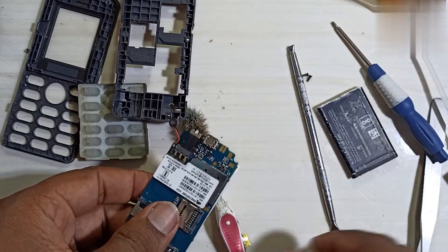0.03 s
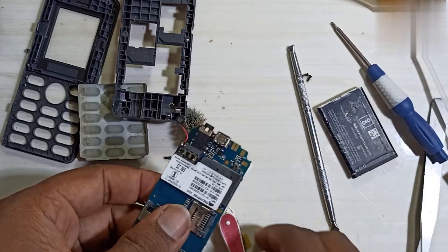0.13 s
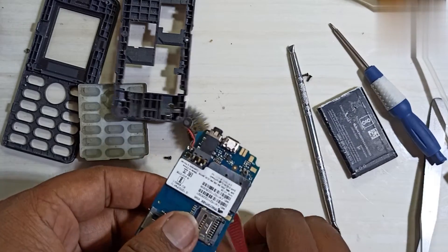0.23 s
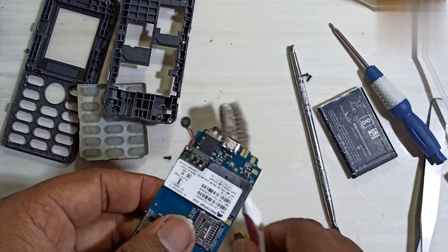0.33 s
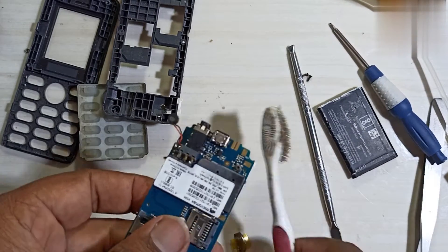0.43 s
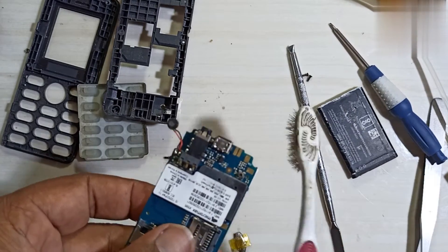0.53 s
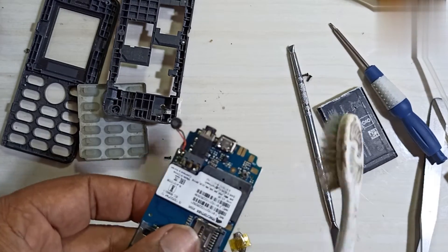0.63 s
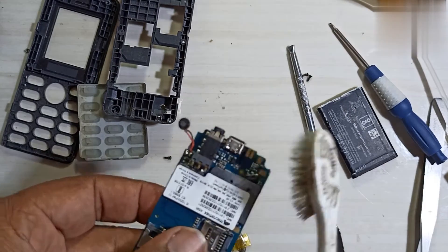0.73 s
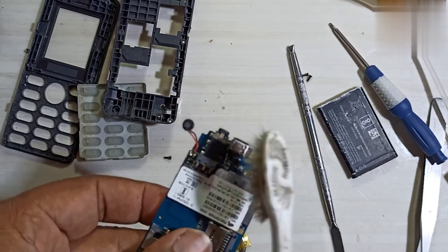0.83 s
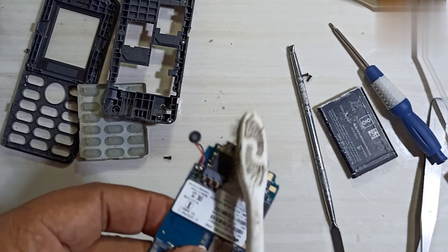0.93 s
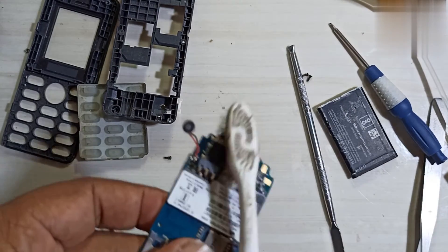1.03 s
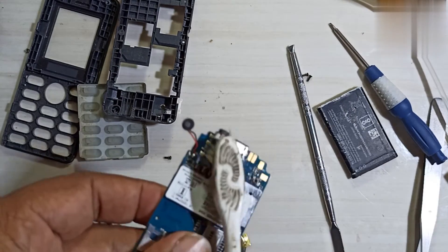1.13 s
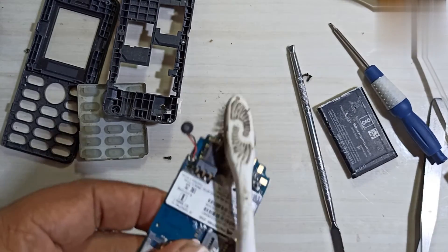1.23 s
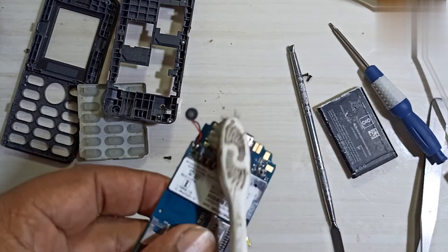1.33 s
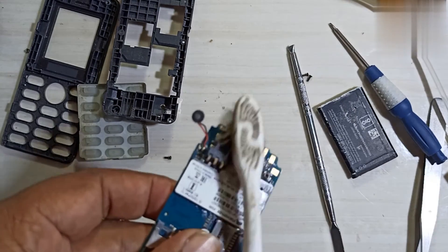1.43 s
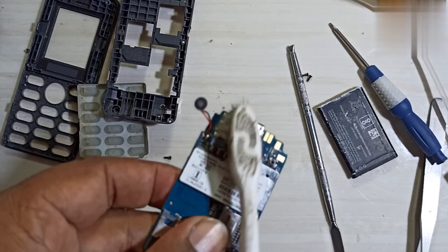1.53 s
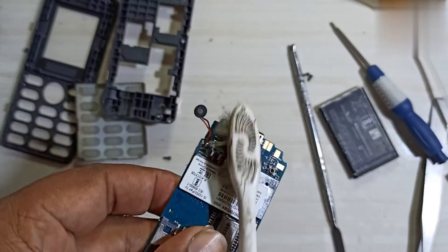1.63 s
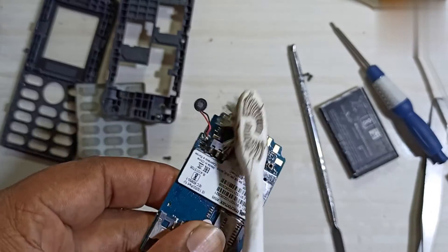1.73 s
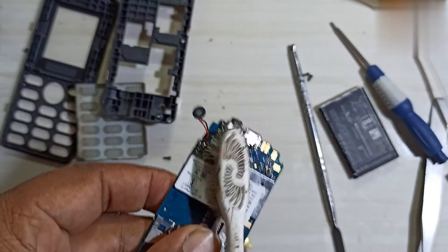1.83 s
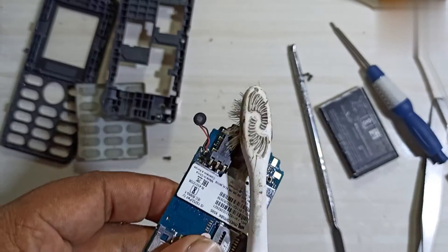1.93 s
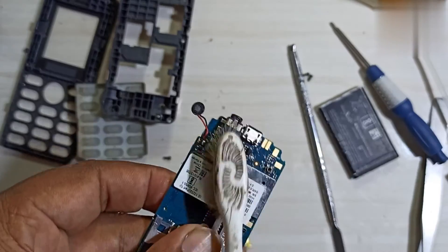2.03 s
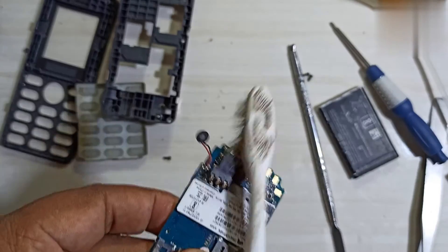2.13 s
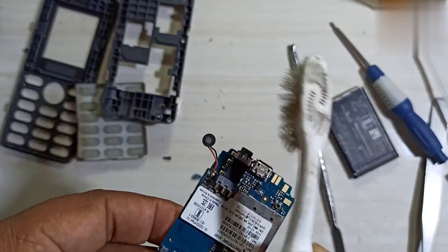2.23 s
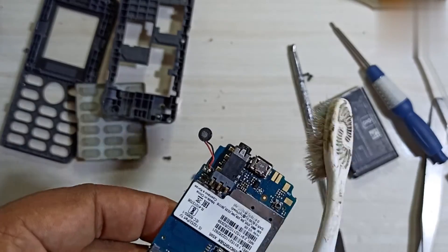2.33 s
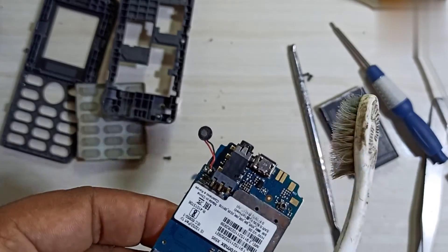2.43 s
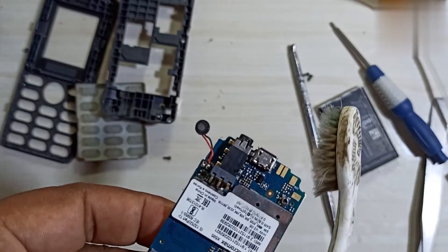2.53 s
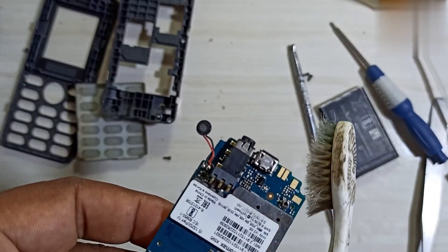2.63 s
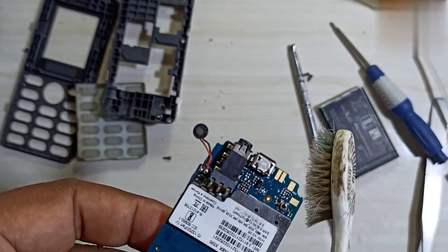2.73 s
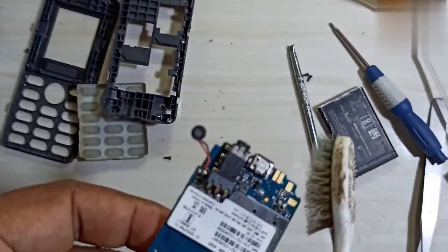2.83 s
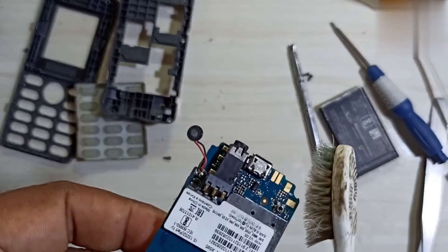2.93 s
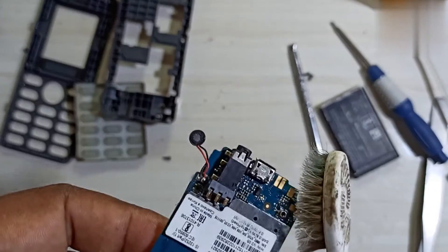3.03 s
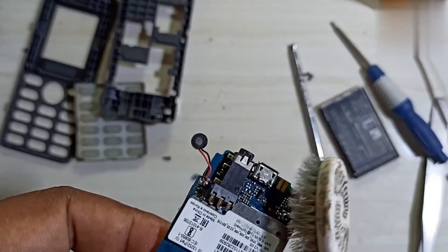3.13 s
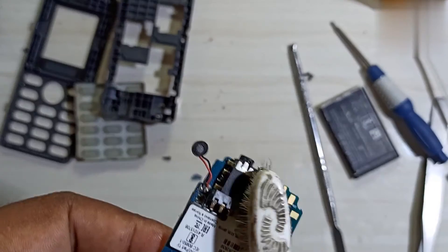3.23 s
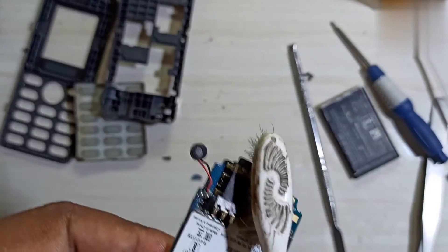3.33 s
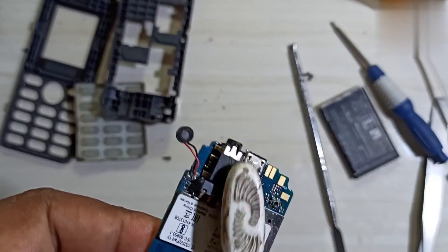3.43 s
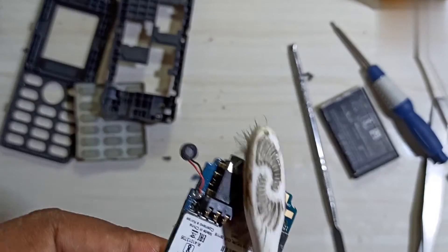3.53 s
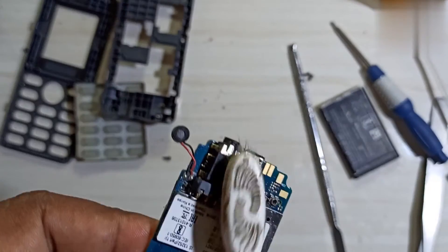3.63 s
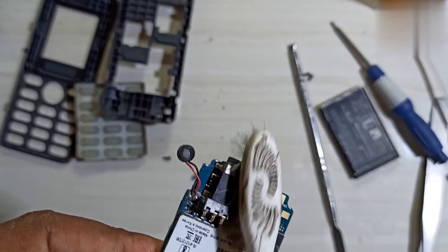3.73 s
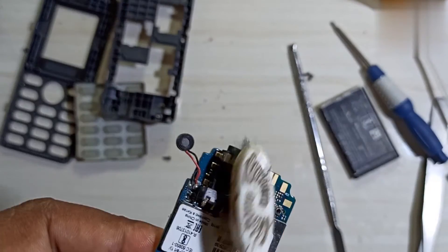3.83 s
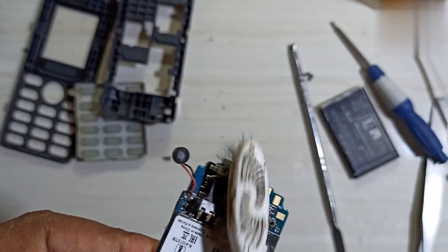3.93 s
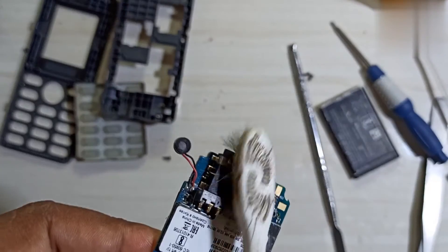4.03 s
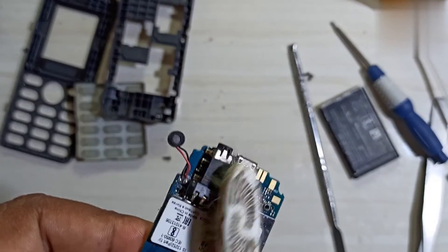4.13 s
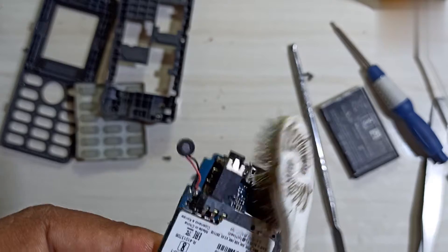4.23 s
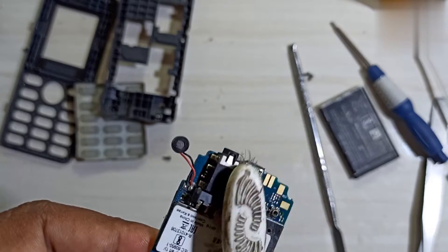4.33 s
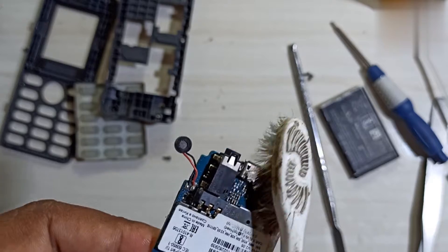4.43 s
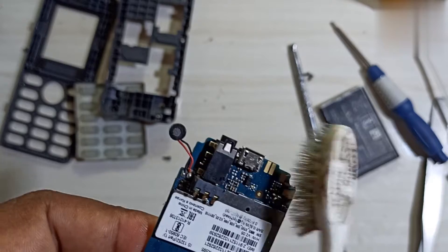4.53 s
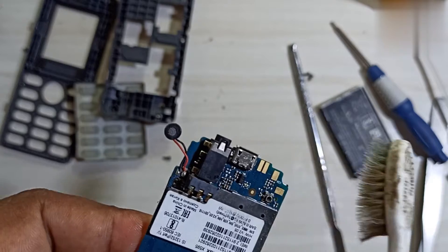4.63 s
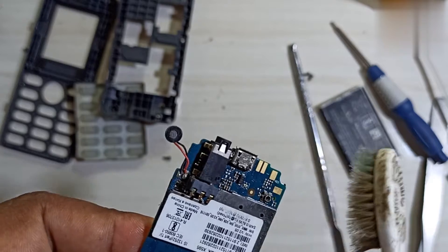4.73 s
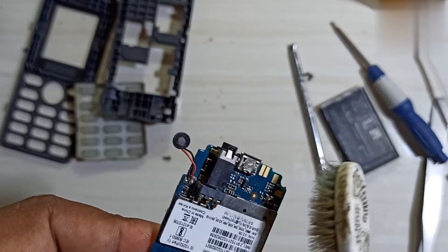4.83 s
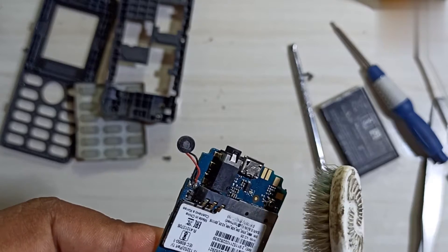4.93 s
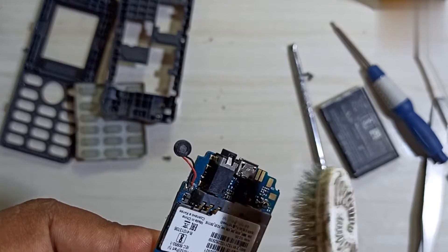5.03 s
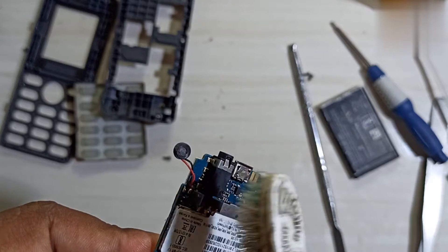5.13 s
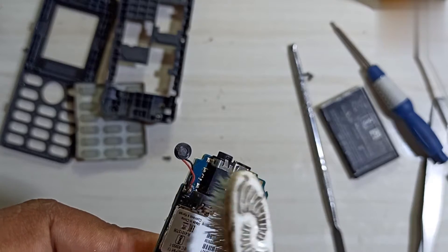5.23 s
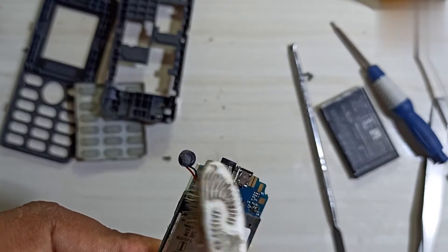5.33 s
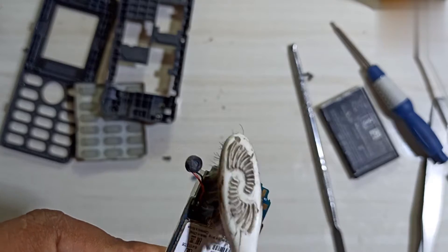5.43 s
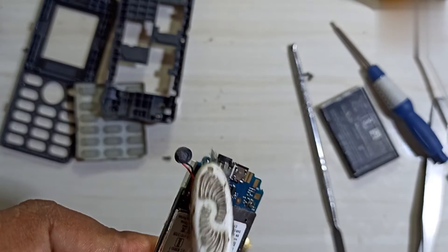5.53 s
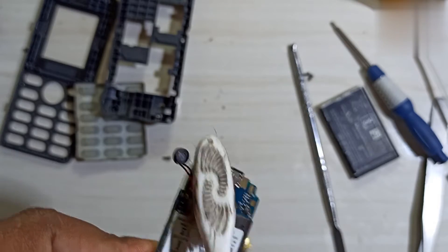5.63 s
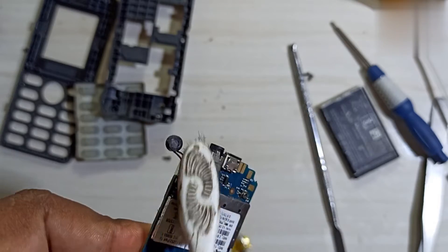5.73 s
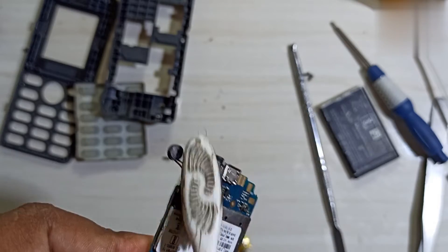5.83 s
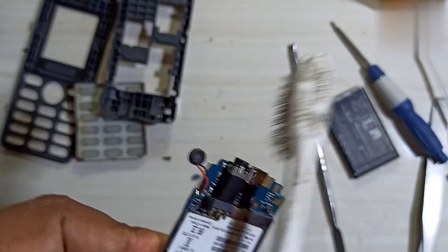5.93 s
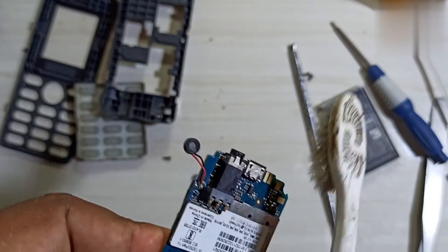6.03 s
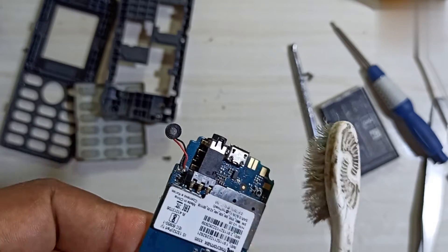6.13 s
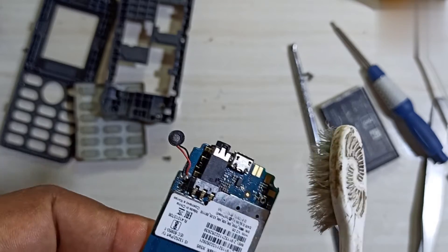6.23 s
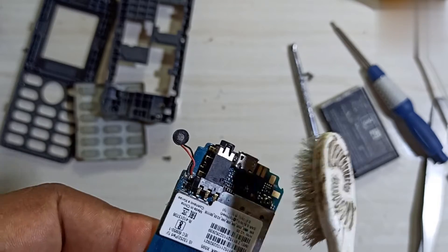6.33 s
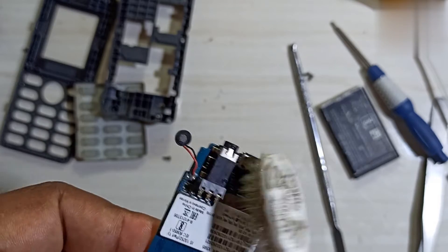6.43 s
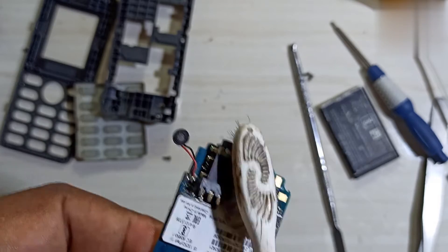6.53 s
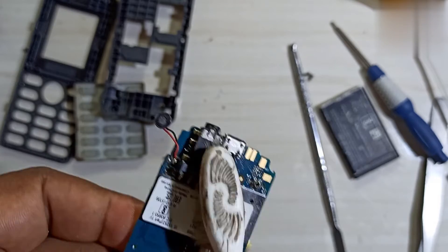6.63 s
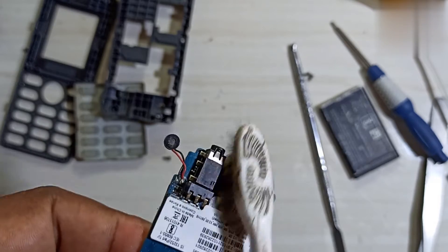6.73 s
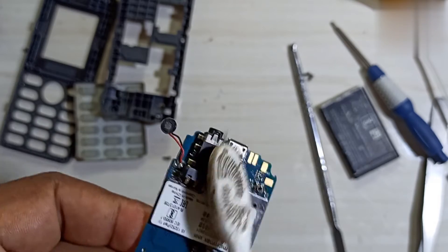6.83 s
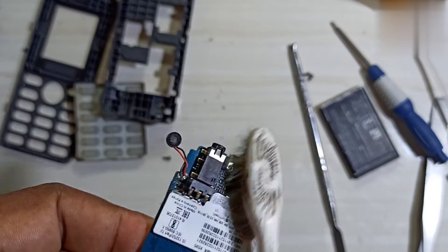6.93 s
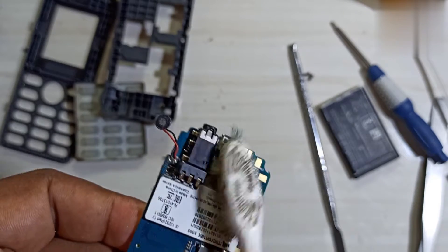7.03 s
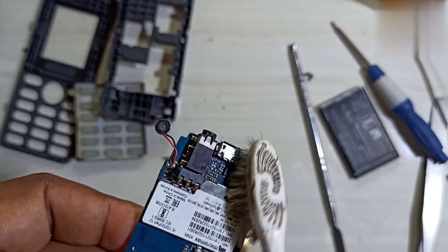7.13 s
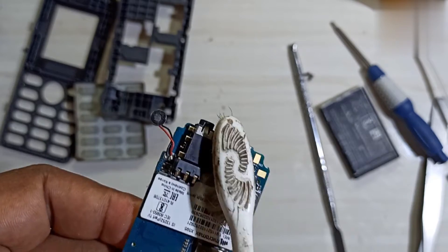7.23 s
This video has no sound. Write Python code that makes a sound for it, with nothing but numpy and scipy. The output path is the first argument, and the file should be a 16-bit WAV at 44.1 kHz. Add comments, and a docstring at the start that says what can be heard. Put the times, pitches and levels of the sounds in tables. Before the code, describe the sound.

A plastic brush handle clacks sharply as it is picked up, followed by rapid, raspy bristle strokes on a hand-held phone board. Two strong bursts are separated by about a second of quiet fan hum; a weaker burst follows, ending in a loud cluster of clicks, and after another gap the scrubbing resumes. Heard very close and dry, with only a short trace of room echo.

```python
"""A fan drones in a quiet room while a toothbrush is picked off a bench, bumping and scuffing close by.
From 0.9 s it scrubs a small circuit board in bursts of short dry strokes: bristle tips slip in dense random
ticks that ring the board, and tufts snap off its parts, hardest just after 5.9 s.
Near 5.7 s a faint wavering tone squeaks. Bumps and ringing are decaying tones and coloured noise."""
import sys
import numpy as np
from scipy import signal
from scipy.fft import rfft, irfft, next_fast_len
from scipy.io import wavfile
from scipy.ndimage import uniform_filter1d

SR = 44100
rng = np.random.default_rng(int(sys.argv[2]) if len(sys.argv) > 2 else 0)


def wav_out(sig):
    """Save sig, one row per channel (or a flat mono array), as 16-bit PCM at SR to the path in sys.argv[1]."""
    wavfile.write(sys.argv[1], SR, np.round(np.clip(np.atleast_2d(sig).T, -1, 1) * 32767).astype(np.int16))


N = 321930
M = next_fast_len(N + 8192)  # padded length for filtering
HZ = np.maximum(np.arange(M // 2 + 1) * SR / M, 1)
TIME = np.arange(N) / SR
SIDE = np.array([[1], [-1]])  # left, right


def undb(db):
    """Turn decibels into an amplitude factor."""
    return np.exp(np.asarray(db) * (np.log(10) / 20))


def on_hz(points):
    """Read a (Hz, value) table at every frequency, along a logarithmic pitch scale."""
    hz, value = np.transpose(points)
    return np.interp(np.log(HZ), np.log(hz), value)


def causal(db):
    """Make a filter with this gain that never sounds ahead of its input, from the folded cepstrum."""
    cepstrum = irfft(db * np.log(10) / 20, M)
    cepstrum[1:M // 2] *= 2
    cepstrum[M // 2 + 1:] = 0
    return np.exp(rfft(cepstrum))


def unit(x):
    """Scale to an RMS level of 1."""
    return x / np.sqrt(np.mean(x ** 2))


def smooth_twice(x, width, axis=-1):
    """Run a moving average over the values twice."""
    return uniform_filter1d(uniform_filter1d(x, width, axis=axis), width, axis=axis)


def walk(rate):
    """Wander at random: values held for 1 / rate seconds, then smoothed twice; spread near 1."""
    hold = int(SR / rate)
    steps = np.repeat(rng.standard_normal(N // hold + 1), hold)
    return unit(smooth_twice(steps, hold)[:N])


def spread(shared, make):
    """Make two channels that have one part in common and one part each."""
    shared = np.clip(shared, 0, 1)
    return np.sqrt(shared) * make() + np.sqrt(1 - shared) * np.array([make(), make()])


def fade(t60):
    """Fall by 60 dB in t60 seconds: the factor kept from one sample to the next."""
    return undb(-60 / t60 / SR)


def room():
    """Fan drone (narrow bands of noise) and air noise, over the microphones' own hiss."""
    # Colour of the air noise. Each row: frequency in Hz, relative level in dB per Hz.
    air_tone = [(18, -90), (30, -37), (65, -18.5), (126, -2), (207, -8), (233, -11), (262, -8.5),
                (431, -13), (916, -19.5), (1110, -22.5), (1580, -22), (2250, -25), (2700, -32.5),
                (5240, -39.5), (6790, -53), (8400, -62), (10900, -78), (18500, -120)]
    # Fan drone bands. Each row: centre in Hz, width in Hz, level in dB before wavering and left-right balance.
    fan_bands = [(83.5, 7.8, -70), (122, 14, -67.5), (163, 42, -75), (200.5, 10, -69), (922.5, 23, -76.5)]
    # How alike left and right are. Each row: frequency in Hz, likeness from -1 (opposite) to 1 (same).
    room_likeness = [(40, 0.099), (130, 1), (290, 0.44), (640, 0.34), (1400, -0.31), (3000, -0.055)]
    # Colour of the microphones' hiss. Each row: frequency in Hz, relative level in dB per Hz.
    hiss_tone = [(2500, -7), (6000, -1.5), (7000, -1), (8400, -7.5), (12000, -11.5), (15500, -11)]

    alike = np.clip(on_hz(room_likeness), -.99, .99)
    mid, side = rfft(rng.standard_normal((2, M))) * np.sqrt([1 + alike, 1 - alike])
    white = np.array([mid + side, mid - side])
    air = unit(irfft(white * undb(on_hz(air_tone)), M)[:, :N])
    air = air * undb(-54.5 + 0.17 * walk(4.74))
    for hz, width, db in fan_bands:
        band = white / (1 + (2 * (HZ - hz) / width) ** 2)
        air = air + undb(db + 3.3 * walk(6.0)) * unit(irfft(band, M)[:, :N])
    hiss = unit(irfft(rfft(rng.standard_normal((2, M))) * undb(on_hz(hiss_tone)), M)[:, :N])
    # the drone and the air are a little stronger on the right
    air = air * undb([[-.6], [.6]])
    return air + hiss * undb(-66.0 + 0.6 * walk(3))


def handle():
    """Each contact scuffs in a band set by its hardness, rings nearby modes of the handle, thuds and rattles."""
    # The handle meets the bench. Each row: start in seconds, relative level in dB, contact centre in Hz,
    # fade by 60 dB in seconds, relative level of the bench thud in dB.
    knocks = [(0, -39.5, 3400, 0.18, -42), (.002, -43, 7280, .25, -70), (0.067, -50, 7500, .06, -70),
              (0.059, -45, 900, 0.094, -48), (0.149, -46.5, 2310, 0.059, -39),
              (0.1844, -50, 1890, 0.057, -36), (0.186, -40.5, 720, 0.035, -58),
              (0.199, -49, 2500, 0.052, -63), (.208, -48.5, 2250, 0.094, -36),
              (0.24, -47.5, 4320, 0.3, -55), (0.271, -28, 2000, 0.088, -54), (.286, -23, 6800, 0.077, -53),
              (0.2856, -19.5, 3560, 0.034, -38), (0.2926, -27.5, 7200, 0.025, -41),
              (0.299, -37.5, 940, 0.27, -44), (.3, -44, 444, 0.4, -64), (0.331, -44, 4300, 0.2, -40),
              (0.368, -50, 4260, 0.13, -53), (.41, -69, 4250, 0.16, -63), (0.445, -55, 4130, .24, -69),
              (0.501, -52, 3030, 0.061, -61), (.54, -51.5, 6900, 0.17, -65)]
    # Ringing modes of the handle. Each row: frequency in Hz, relative level in dB, longest fade in seconds.
    handle_modes = [(129, 11.5, 0.11), (206, 3, .08), (317, 2, 0.08), (499, 2, .1), (721, 2.5, 0.095),
                    (925, 0.5, .15), (1674, 2, 0.033), (2615, -4, 0.025), (3170, -4.5, 0.028),
                    (3390, -3.5, 0.045), (4220, -1, 0.064), (6200, 4, 0.035), (7240, 3, 0.041),
                    (8050, 1, 0.043)]
    # Bench thud and soft rattle. Each: centre in Hz, reach in octaves, fade by 60 dB in seconds,
    # share alike at both ports, rise as a share of the fade.
    thud_kind, rattle_kind = (200, 1.57, 0.2, 1.05, 0.027), (2700, 1.44, 0.17, 0.47, 0.0059)
    ring_db, rattle_db, grit_db = -8, -13, -22  # ring and grit join the scuff; rattle is relative to the bump
    crack_db, crack_t60_s = -12, 0.016  # first instant of a contact
    left_lead_s = .00004

    out, t = np.zeros((2, N)), TIME[:12000]
    hz = np.maximum(np.fft.rfftfreq(len(t), 1 / SR), 1)
    # continued rubbing keeps the same modes sounding, roughly
    body = 0.82 + sum(undb(db) / (1 + ((hz - f) / (0.046 * f + 15)) ** 2) for f, db, _ in handle_modes)

    def contact(db, centre_hz, octaves, t60, alike, rise, grit=0):
        """One touch: ringing modes plus a scuff of noise, both strongest near the contact's centre."""
        def reach(f):
            return 1 / (1 + (np.log2(f / centre_hz) / octaves) ** 4)

        ring = 0
        for f, mode_db, own_t60 in handle_modes:
            decay = undb(mode_db - 60 * t / min(own_t60, t60, .06))
            ring = ring + reach(f) * decay * np.sin(2 * np.pi * (f * t + rng.random()))
        noise = spread(alike, lambda: rng.standard_normal(len(t)))
        scuff = unit(irfft(rfft(noise) * (reach(hz) * body + grit * (hz > centre_hz))))
        scuff = scuff * (0.43 * undb(-60 * t / t60) + undb(crack_db - 60 * t / crack_t60_s))
        onset = t / (t + rise * t60)
        return undb(db) * onset * (undb(ring_db) * ring + scuff)

    for start, db, contact_hz, t60, thud_db in knocks:
        bump = contact(db, contact_hz, 0.95, t60, alike=0.53, rise=0.011, grit=undb(grit_db))
        bump = bump + contact(thud_db, *thud_kind) + contact(db + rattle_db, *rattle_kind)
        out[:, int(start * SR):int(start * SR) + len(t)] += bump
    return irfft(rfft(out, M) * np.exp(1j * np.pi * SIDE * HZ * left_lead_s), M)[:, :N]


def slips(per_s, scatter_db):
    """Bristle tips letting go at random moments, a few much harder than the rest."""
    chance = rng.random((2, N))
    size = undb(scatter_db * np.minimum(rng.exponential(size=N), 4.5)) * np.sign(chance[1] - .5)
    return unit((chance[0] < per_s / SR) * size)


def patchy(pair):
    """The bristles cross other parts from moment to moment, so the colour of the scrub keeps shifting."""
    _, _, spectrum = signal.stft(pair, nperseg=512)

    def field(hz, s):
        """Random levels in patches about this broad and this long."""
        bins, frames = max(int(hz * 512 / SR), 1), max(int(s * SR / 256), 1)
        patches = smooth_twice(rng.standard_normal(spectrum.shape[1:]), bins, axis=0)
        return unit(smooth_twice(patches, frames, axis=1))

    # short broad patches, and finer colour that lasts about a stroke
    db = 2.48 * field(hz=450, s=.02) + 1.2 * field(hz=120, s=.12)
    return unit(signal.istft(spectrum * undb(db), nperseg=512)[1][:, :N])


def strokes(ring_db):
    """Each stroke speeds up and slows down; its power is shared between bristle hiss and board ring."""
    # Strokes on the board. Each row: fastest moment in seconds, length in seconds, relative level in dB, kind.
    scrubs = [(0.918, .048, -53, 'dab'), (0.987, 0.13, -48.5, 'back'), (1.14, 0.12, -44.5, 'out'),
              (1.23, .12, -40, 'back'), (1.376, 0.13, -43.5, 'out'), (1.472, 0.12, -44, 'back'),
              (1.599, 0.11, -41, 'out'), (1.698, 0.14, -41.5, 'back'), (1.835, 0.12, -41, 'out'),
              (1.926, 0.12, -36.5, 'back'), (2.066, 0.11, -37, 'out'), (2.161, 0.16, -36, 'back'),
              (2.24, 0.3, -67.5, 'back'), (3.279, 0.083, -49.5, 'dab'), (3.342, 0.088, -43, 'back'),
              (3.469, 0.11, -44, 'out'), (3.555, 0.11, -41.5, 'back'), (3.681, 0.1, -43, 'out'),
              (3.766, 0.12, -42.5, 'back'), (3.9, 0.11, -42, 'out'), (3.988, 0.13, -40.5, 'back'),
              (4.131, 0.11, -37, 'out'), (4.213, .14, -39.5, 'back'), (4.319, 0.1, -39, 'back'),
              (4.432, 0.15, -42.5, 'back'), (4.535, 0.09, -57, 'out'), (5.384, 0.045, -56.5, 'dab'),
              (5.439, 0.1, -52, 'back'), (5.576, 0.11, -49.5, 'out'), (5.665, 0.11, -50, 'back'),
              (5.793, 0.094, -49, 'out'), (5.887, 0.086, -48.5, 'out'), (5.919, 0.12, -39, 'dab'),
              (6.01, 0.17, -67, 'back'), (6.065, 0.035, -49.5, 'dab'), (6.127, .093, -70, 'back'),
              (6.57, .13, -48, 'out'), (6.672, 0.1, -47.5, 'out'), (6.754, 0.15, -41.5, 'back'),
              (6.886, 0.09, -39, 'out'), (6.965, 0.15, -42, 'back'), (7.091, 0.11, -42, 'out'),
              (7.155, 0.14, -47, 'back'), (7.251, 0.11, -48.5, 'back')]
    # Outward strokes peak late, returns midway, dabs early.
    # Each kind: share of the stroke spent speeding up, extra board ring in dB.
    stroke_kinds = {'out': (0.76, -0.23), 'back': (0.53, 0.33), 'dab': (0.28, -0.37)}
    steepness = 2.27  # of a stroke's ends
    splay = 1  # bristles splay at speed, which flattens a stroke's top (lower = flatter)
    hiss_drag_db, ring_drag_db, drag_round = -17, -12.5, 0.38  # drag that fills out the slow ends

    hiss_power, ring_power = np.zeros(N), np.zeros(N)
    for fastest, length, db, kind in scrubs:
        rise, extra_ring_db = stroke_kinds[kind]
        start = fastest - rise * length
        end = start + length
        at = slice(int(start * SR), int(end * SR))
        speed = np.sin(np.pi * np.interp(TIME[at], [start, fastest, end], [0, .5, 1])) ** 2
        scrape = speed ** steepness * (1 + splay) / (speed ** steepness + splay)
        drag = speed ** drag_round
        share = undb(2 * (ring_db[at] + extra_ring_db))  # ring power over hiss power
        hiss_power[at] += (scrape + undb(2 * hiss_drag_db) * drag) * undb(2 * db) / (1 + share)
        ring_power[at] += (scrape + undb(2 * ring_drag_db) * drag) * undb(2 * db) / (1 + 1 / share)
    return hiss_power, ring_power


def tufts(hiss_power):
    """Tufts land on or snap off parts: a sharp tick with a short spray, and a fading rattle of slips."""
    # Tuft contacts. Each row: start in seconds, relative tick level in dB, relative rattle level in dB.
    snaps = [(0.9145, -25, -39.5), (1.1913, -34, -54), (1.2063, -17, -47), (1.3295, -28, -52),
             (1.399, -23, -46), (1.663, -18, -38), (1.705, -12, -41), (1.829, -12, -37), (1.876, -11, -35),
             (2.009, -22, -46), (2.113, -15, -39), (2.1524, -13, -46), (2.199, -11, -33),
             (2.245, -19.5, -43), (3.2352, -33, -38), (3.2547, -29, -41.5), (3.4156, -27, -52),
             (3.4528, -17, -34), (3.518, -26, -46), (3.746, -22, -46), (4.001, -24, -35),
             (4.0696, -28, -54), (4.1701, -28, -46), (4.3133, -11.5, -44), (4.4035, -17.5, -47),
             (5.38, -34, -51), (5.5562, -31, -43), (5.607, -34, -47), (5.6603, -12, -51),
             (5.9113, 2.5, -25), (5.9246, -21, -36), (5.945, -15, -36), (5.966, -16, -39.5),
             (5.977, -6.5, -34), (5.9793, -10, -50), (6.0628, -10, -47), (6.0745, -14, -48),
             (6.083, -28, -43), (6.177, -43, -50.5), (6.4304, -48, -61), (6.486, -43, -56),
             (6.518, -31, -47), (6.559, -23, -44), (6.6285, -38, -57), (6.649, -23, -39), (6.707, -22, -41),
             (6.832, -25, -46), (6.936, -16, -38), (7.052, -20, -41), (7.145, -26, -41), (7.2489, -29, -44)]
    catches_per_s, catch_tick_db, catch_rattle_db = 45, 15, -15  # small catches; relative to the stroke's hiss
    rattle_t60_s, spray_t60_s, spray_db = 0.038, 0.01, -15

    # smaller tufts catch at random, about as hard as the stroke is at that moment
    catches = (rng.random(N) < catches_per_s / SR) * np.sqrt(hiss_power) * undb(1.1 * rng.standard_normal(N))
    snap, shake = catches * undb(catch_tick_db), catches * undb(catch_rattle_db)
    for start, tick_db, rattle_db in snaps:
        snap[int(start * SR)], shake[int(start * SR)] = undb(tick_db), undb(rattle_db)
    rattle = spread(0.067, lambda: slips(per_s=19000, scatter_db=6.5))
    rattle = rattle * signal.lfilter([1], [1, -fade(rattle_t60_s)], shake)
    # a tuft lets go bristle after bristle
    spray = spread(0.9, lambda: rng.standard_normal(N)) * signal.lfilter([1], [1, -fade(spray_t60_s)], snap)
    return 0.68 * snap + undb(spray_db) * spray, rattle


def ports(spectra):
    """The left port hears the brush a little earlier, and the two ports differ in colour."""
    # Left port against right. Each row: frequency in Hz, left minus right in dB.
    port_difference = [(1000, -3.5), (2400, -4.5), (3900, -4.5), (4300, 0.5), (4900, -9), (5750, 7.5),
                       (6300, -4.5), (6750, -2.5), (7300, 3), (8300, -2), (9300, -8.5), (12000, -8.5),
                       (15000, -9)]
    left_lead_s = 0.00013
    lead = np.exp(1j * np.pi * SIDE * HZ * left_lead_s)
    return irfft(spectra * undb(SIDE * on_hz(port_difference) / 2) * lead, M)[:, :N]


def brush():
    """Slipping bristles hiss, ring and bend the board, harder as they move faster; tufts tick on its parts."""
    # Where the brush works. Each row: time in seconds, board ring minus bristle hiss in dB before the
    # layers' own gains, left minus right in dB before the ports' colour.
    places = [(.92, -10, 3), (.99, -8.5, 4.5), (1.6, -8.5, 6), (2.17, -10, 5.5), (2.25, -2.5, 2.5),
              (3.25, -8.5, 8.5), (3.33, -7.5, 5.5), (3.47, -6.5, 7.5), (3.9, -6.5, 6.5), (4.33, -7, 7),
              (4.43, -10, 5), (4.53, -4.5, 5.5), (5.42, -6, 6.5), (5.57, -8.5, 6.5), (5.66, -2.5, 8),
              (5.79, -8, 6.5), (6.1, 1, 5.5), (6.56, -7.5, 6.5), (6.68, -8, 6.5), (6.88, -11, 6),
              (6.97, -6.5, 5.5), (7.09, -8.5, 5.5), (7.25, -10.5, 5.5)]
    # Grip on the board. Each row: time in seconds, relative level in dB of the ring that the fingers damp.
    grip = [(.9, 3), (2.3, 3), (3.2, -4), (4.6, -4), (5.3, 0.5), (6.2, 6), (6.5, -1), (7.3, 2)]
    # Shields and sockets ring. Each row: frequency in Hz, width in Hz, boost in dB.
    ringing_parts = [(1940, 71, 6), (3190, 54, 8), (3900, 48, -1.5), (4276, 120, 4), (4580, 110, 5.5),
                     (5300, 710, 9.5), (6130, 160, 6.5), (6504, 205, 8.5), (6798, 153, 9), (7460, 79, 7),
                     (7586, 190, 6), (8096, 230, 7), (8337, 130, 12.5)]
    # Colours of bristle hiss, board ring, the ring that fingers damp, bending of the hand-held board
    # and tuft ticks. Each row: frequency in Hz, relative level in dB.
    hiss_colour, ring_colour, damped_colour = [(3500, -26.5), (5200, 1), (6000, -1), (6750, -2),
                                               (7600, 0.5), (8300, -9.5), (11000, -9.5), (15500, -14)], [(1200, -23), (1950, -14.5), (2400, -10),
                                                                (3000, -9.5), (3600, -21), (3950, 1),
                                                                (4250, 3), (4800, 4.5), (5500, 3.5),
                                                                (7000, -30)], [(2300, -23), (2700, -11),
                                                                               (2950, -10.5), (3500, 2),
                                                                               (3800, 8.5), (4100, -26)]
    flex_colour, tick_colour = [(300, -23.5), (600, -4), (1000, 5), (1400, -9), (1950, 1.5), (2800, -9.5)], [(1200, -38), (1900, -22), (2500, -37), (3800, 4.5),
                                              (4600, 5.5), (5500, -4.5), (6500, -3.5), (8400, -3.5),
                                              (12000, -7.5), (15500, -27)]
    flex_limit_db = -45  # hiss level, before its layer gain, beyond which the board bends no further

    place_s, place_ring_db, place_pan_db = np.transpose(places)
    ring_db = np.interp(TIME, place_s, place_ring_db)
    pan = undb(SIDE * np.interp(TIME, place_s, place_pan_db) / 2)
    hiss_power, ring_power = strokes(ring_db)
    # tips all over the brush head slip, so each port hears some of them best
    ticks = patchy(spread(0.46, lambda: slips(per_s=3000, scatter_db=2.5)))
    # parts of uneven height make the pressure judder
    hiss = ticks * np.sqrt(hiss_power) * undb(0.77 * walk(60) + 0.76 * walk(250) + 1.5 * walk(700))
    ring = ticks * np.sqrt(ring_power) * undb(0.7 * walk(40) + 1.13 * walk(250) + 1.44 * walk(700))
    bend = np.minimum(hiss_power, undb(2 * flex_limit_db)) ** 0.37
    flex = ticks * bend * undb(7.1 * walk(30) - 25.0)
    snap, rattle = tufts(hiss_power)
    hiss, ring = hiss + rattle, ring + rattle * undb(ring_db - 6)

    damped_db = 7.5 + np.interp(TIME, *np.transpose(grip))
    parts_db = sum(db / (1 + (2 * (HZ - hz) / width) ** 2) for hz, width, db in ringing_parts)
    layers = [(undb(5.5) * hiss, hiss_colour), (undb(10.5) * ring, ring_colour),
              (undb(damped_db) * ring, damped_colour), (flex, flex_colour), (snap, tick_colour)]
    return ports(sum(rfft(x * pan, M) * causal(on_hz(points) + parts_db) for x, points in layers))


def squeak():
    """A thin tone across two strokes near 5.7 s, wavering in pitch and level."""
    # Path of the tone. Each row: time in seconds, middle pitch in Hz, middle level in dB.
    squeak_path = [(5.635, 1950, -90), (5.65, 1960, -76), (5.70, 1920, -68), (5.73, 1930, -65),
                   (5.76, 1970, -75), (5.775, 1980, -92)]
    s, hz, db = np.transpose(squeak_path)
    phase = np.cumsum(np.interp(TIME, s, hz) * (1 + 0.012 * walk(150))) / SR
    level_db = np.interp(TIME, s, db, left=-200, right=-200) + 3.8 * walk(54)
    return np.sin(2 * np.pi * phase) * undb(level_db)


def walls(pair):
    """Bench and walls send back a short, scattered tail, different at each port."""
    t60_s, level_db = 0.13, -11
    t = TIME[:14000]
    tail = rng.standard_normal((2, len(t))) * undb(-60 * t / t60_s) * (t > .002)
    echo = signal.fftconvolve(pair, unit(tail) / np.sqrt(len(t)), axes=1)[:, :N]
    return pair + undb(level_db) * echo


def scene():
    """Bench sounds with their echoes, over the room."""
    return walls(brush() + handle() + squeak()) + room()


def record(dry):
    """The whole sound dips near 5.5 kHz, is weak from about 9 to 11.5 kHz and stops above 15.5 kHz."""
    # Overall colour. Each row: frequency in Hz, gain in dB.
    overall_colour = [(4800, 0), (5200, -6), (6000, -5.5), (6300, 0), (8450, 0.5), (8700, -1.5),
                      (9500, -12), (10300, -11.5), (11300, -37.5), (11650, 2.5)]
    top_hz = 15450
    coloured = irfft(rfft(dry, M) * causal(on_hz(overall_colour)), M)[..., :N]
    return signal.sosfilt(signal.ellip(11, .2, 75, top_hz, fs=SR, output="sos"), coloured)


dry = scene()
out = record(dry)
wav_out(out)
```